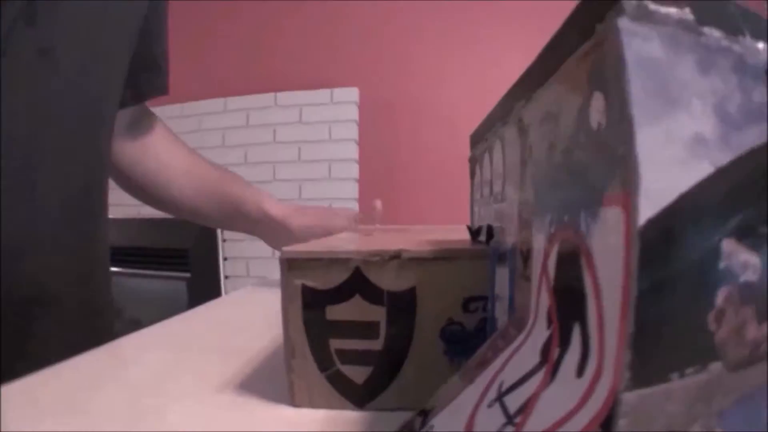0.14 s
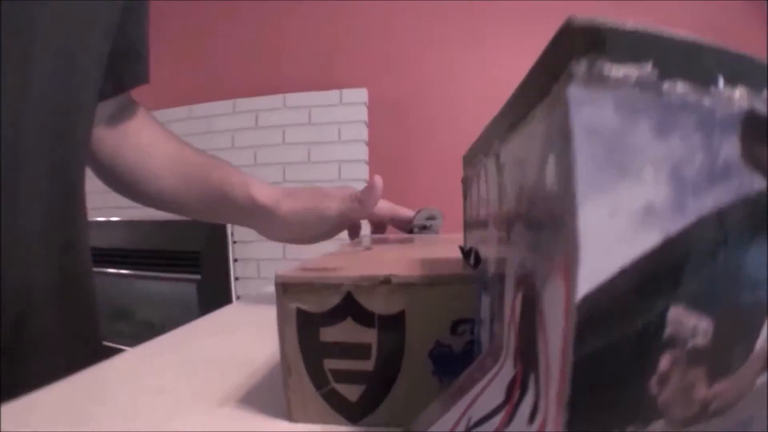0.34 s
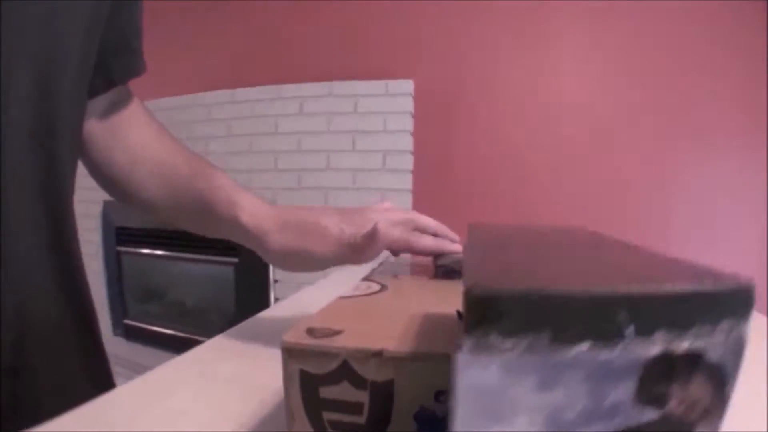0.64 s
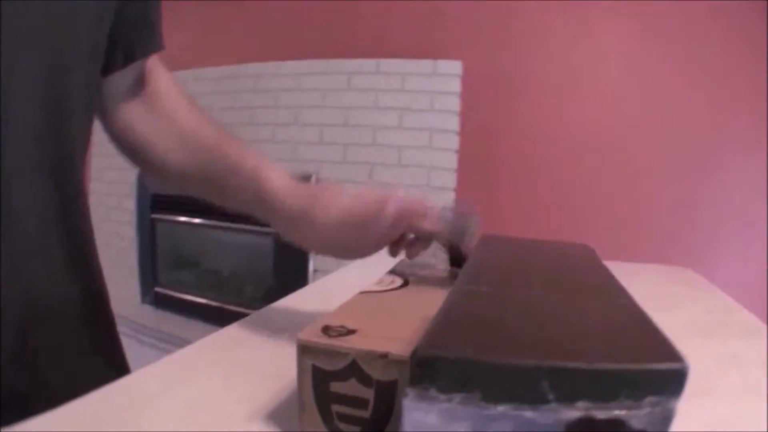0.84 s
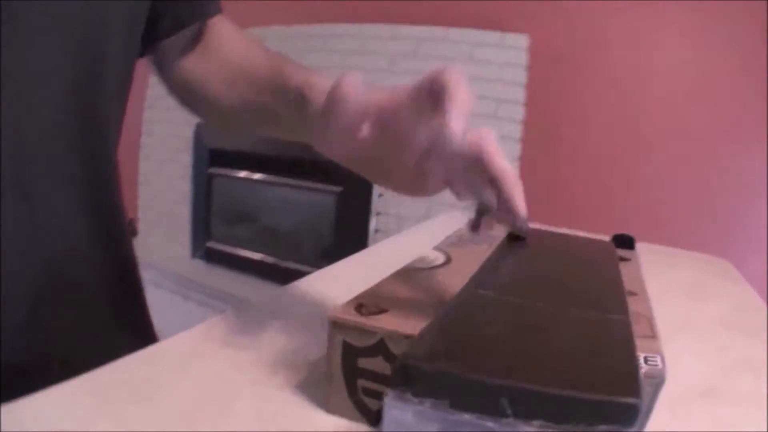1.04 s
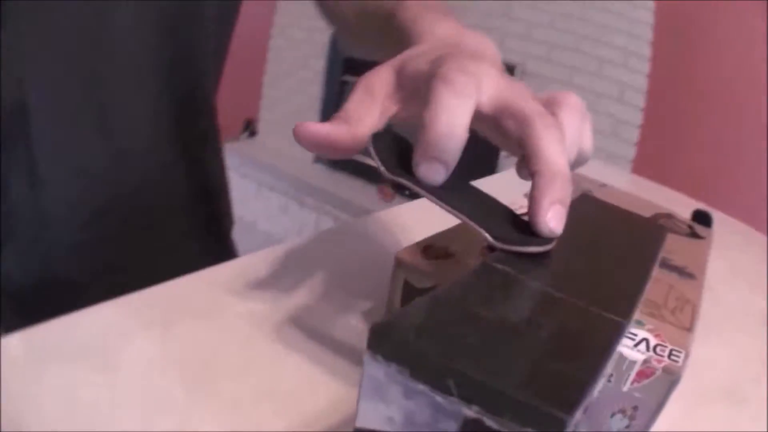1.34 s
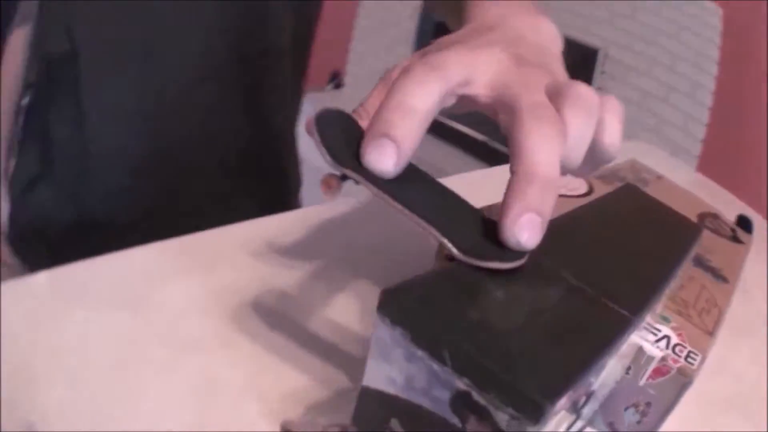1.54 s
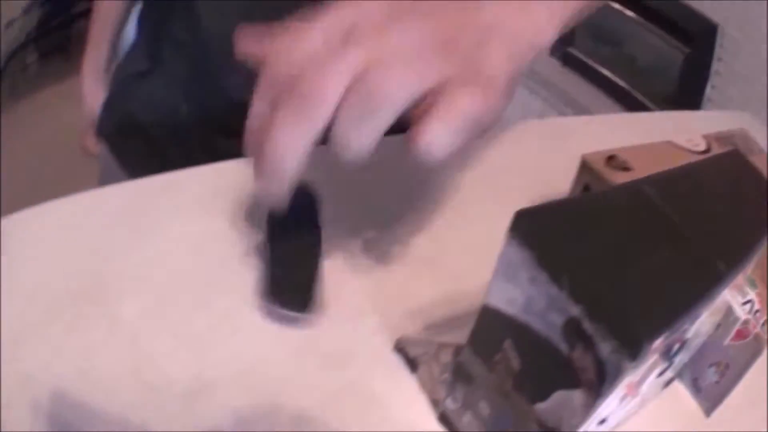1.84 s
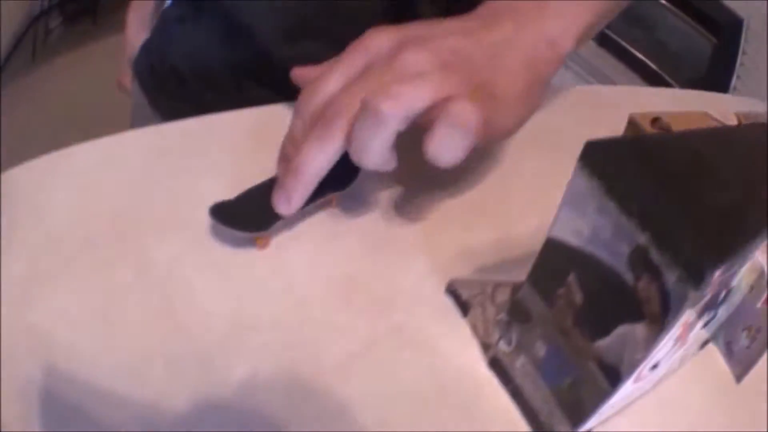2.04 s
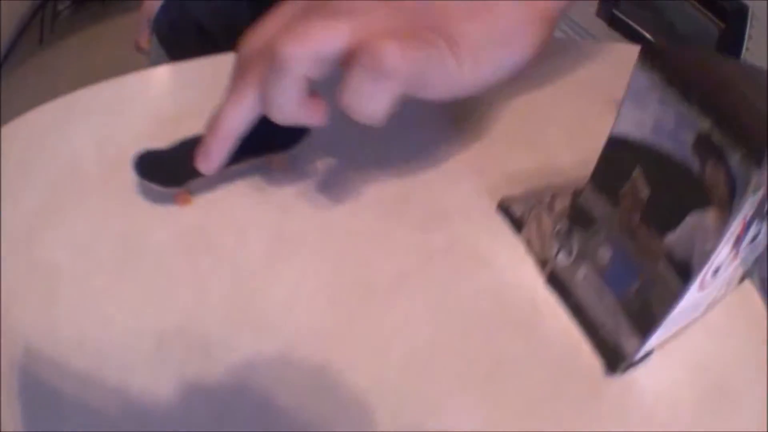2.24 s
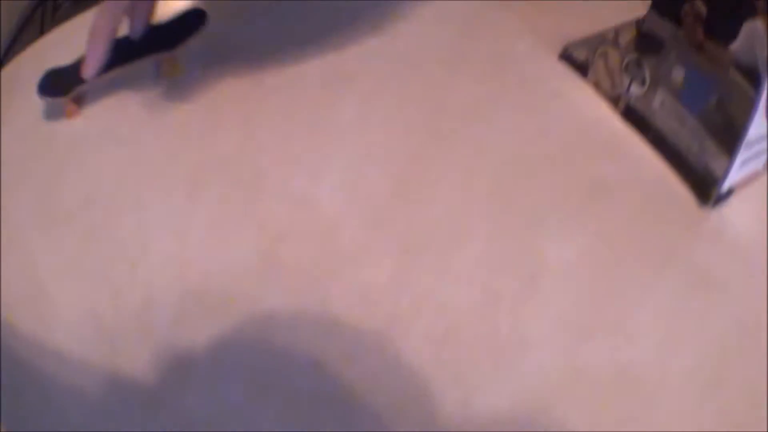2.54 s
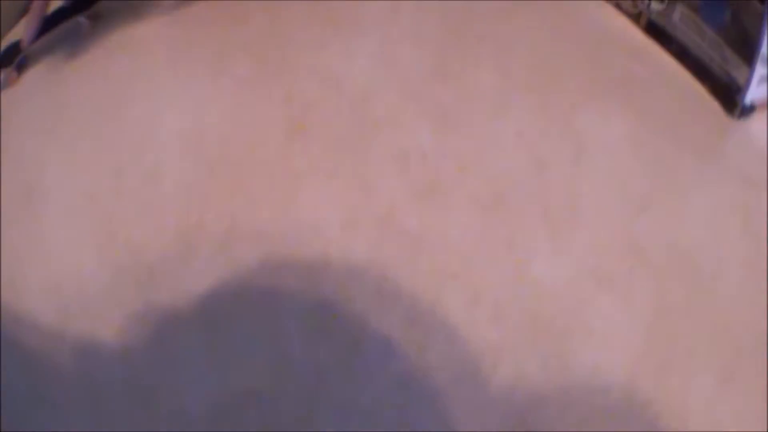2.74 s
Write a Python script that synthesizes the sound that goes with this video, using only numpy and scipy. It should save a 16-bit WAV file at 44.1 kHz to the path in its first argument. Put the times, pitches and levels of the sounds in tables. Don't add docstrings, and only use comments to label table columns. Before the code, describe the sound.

Close stereo microphone on a toy skateboard: soft rolling, hollow box thumps and clacks, light grinding and rough ticking scrape, a crisp landing with gritty skid and brief chirps, then quiet rolling in a small room.

```python
import sys
import numpy as np
from scipy import signal
from scipy.fft import rfft, irfft
from scipy.io import wavfile
from scipy.ndimage import uniform_filter1d

SR = 44100
rng = np.random.default_rng(int(sys.argv[2]) if len(sys.argv) > 2 else 0)


def invert_db(x):
    u = np.asarray(x, float) / 20
    return 10 ** u


def persist_wave(psi):
    counts = np.round(np.clip(psi, -1, 1) * 32767).astype(np.int16)
    wavfile.write(sys.argv[1], SR, np.atleast_2d(counts).T)


N = 127890
EDGE_HZ = 15900
HZ = np.fft.rfftfreq(8192, 1 / SR)

# time in seconds, surface load in dB, grit in dB relative to the load.
RUN_UP = [(0, -48, -5), (.16, -47, -4), (.242, -48, -7)]
BOX_ROLL = [(.247, -27, -7), (.3, -31, -10), (.312, -33, -12), (.33, -28, -8), (.36, -32, -17),
            (.51, -34, -14), (.602, -39, -16), (.612, -40, -6), (.655, -43, -14), (.738, -47, -18)]
RAMP_ROLL = [(.743, -31, -22), (.77, -32, -22), (.85, -32, -28), (.89, -28, -26), (.91, -32, -26),
             (.965, -27, -22), (1.01, -37, -28), (1.075, -45, -24)]
RAMP_CLIMB = [(.78, -48, -28), (.89, -32, -28), (.955, -28, -27), (1.02, -46, -26)]
TAIL_DRAG = [(1.082, -25, -16), (1.11, -29, -22), (1.195, -45, -24), (1.22, -38, -28), (1.264, -46, -22)]
GRIND = [(1.27, -41, 3), (1.34, -43, -1), (1.42, -53, -1), (1.58, -58, -2)]
SCRAPE = [(1.596, -47, 0), (1.645, -43, 1), (1.672, -49, 0), (1.69, -43, 0), (1.722, -48, 1),
          (1.75, -44, 0), (1.78, -47, 3), (1.825, -46, 7), (1.85, -46, 5), (1.878, -44, 4)]
TOUCH_DOWN = [(2.02, -38, 6), (2.05, -39, 4), (2.105, -46, 4)]
SKID = [(2.121, -43, 13), (2.17, -38, 9), (2.21, -36, 0), (2.25, -41, -4), (2.29, -46, -6)]
ROLL_OUT = [(2.295, -45, -3), (2.4, -45, -4), (2.545, -42, -1), (2.58, -45, -3), (2.62, -42, -5),
            (2.9, -45, -5)]

# frequency in Hz, width in Hz, level in dB.
COUNTER_FAR = [(525, 90, -1), (843, 40, -4), (1060, 70, -4), (1234, 97, -3)]
COUNTER = [(450, 25, -7), (715, 25, -4), (860, 40, -4), (1135, 55, 2), (1432, 40, -9)]
COUNTER_LOADED = [(300, 120, -11), (750, 200, 0), (1150, 250, 0), (1500, 200, -4), (2000, 600, -8)]
BOX = [(265, 40, -2), (500, 120, -2), (703, 50, 1), (840, 60, -2), (1120, 40, -7), (1450, 35, -6),
       (1605, 70, -5)]
RAMP = [(270, 40, -4), (415, 50, 5), (880, 120, -6)]
RAMP_FLEXED = [(880, 110, 1), (1125, 50, -5), (1620, 70, -7), (2150, 60, -12)]
RAMP_TOP = [(268, 40, 5), (313, 30, 5), (355, 50, 7), (550, 60, -3), (900, 90, -11)]
LEDGE_TOP = [(155, 50, 9), (850, 300, 0), (450, 150, -5)]
LEDGE = [(150, 32, 9), (460, 40, 0), (990, 80, -1), (1480, 60, -6), (1980, 110, -5), (2360, 70, -8)]

# frequency in Hz, width in Hz, level in dB.
AXLES = [(4150, 800, 1), (5200, 1200, -10), (2900, 900, -11), (8300, 3000, -22), (12000, 4000, -27)]
DECK_ON_BOX = [(2150, 150, 1), (2630, 500, -2), (3280, 130, -1), (3800, 800, -4), (6300, 2200, -12),
               (12000, 4000, -30)]
DECK_ON_TAPE = [(2700, 900, -7), (3380, 200, -4), (4250, 900, 0), (5400, 700, -5), (7900, 2600, -5.5),
                (12000, 4000, -15)]
DECK_LANDED = [(2300, 800, -6), (4200, 700, 0), (5000, 500, -1), (7800, 2600, -8), (12000, 4000, -17)]
SLIDING_WHEELS = [(3600, 800, 7), (4700, 1100, 8), (5550, 500, 7), (6500, 600, 7), (9500, 4000, -12)]

# time in seconds, click in dB, thud into the surface in dB relative to the click.
KNOCKS = [(.2466, -21, -3), (.2525, -22, -2), (.265, -24, -4), (.3137, -26, -8), (.321, -23, -3),
          (.6062, -20, -12), (.742, -33, 6), (.7525, -18, -7), (1.079, -18, -5), (1.2685, -12, -22),
          (1.275, -15, -22), (1.2942, -21, -13), (1.323, -23, -15), (1.4591, -25, -14), (1.495, -31, -15),
          (1.5948, -26, -12), (1.6212, -28, -10), (1.639, -27, -15), (1.6452, -23, -15), (1.6805, -27, -4),
          (1.73, -28, -12), (1.7449, -25, -9), (1.7855, -15, -24), (1.802, -20, -20), (1.8108, -16, -22.5),
          (1.821, -16, -30), (1.8258, -16, -20), (1.8758, -20, -15), (2.0184, -13, -20), (2.031, -19, -16),
          (2.039, -21, -16), (2.1104, -18, -10), (2.1178, -17, -18), (2.3266, -21, -22), (2.5057, -32, -12),
          (2.54, -25, -13), (2.6192, -12, -34)]
# time in seconds, frequency in Hz, level in dB.
RINGS = [(.0258, 4000, -45), (.1605, 4220, -44), (.2505, 640, -29), (.2513, 3600, -30), (.256, 1600, -25),
         (.287, 3200, -32), (.308, 1570, -28), (.3137, 2650, -32), (.322, 700, -26), (.325, 3280, -31),
         (.6065, 2170, -36), (.7523, 2160, -27), (.884, 400, -25), (.953, 1620, -33), (.966, 420, -23),
         (1.0795, 900, -25), (1.096, 550, -24), (1.2685, 4300, -24), (1.4591, 3600, -35),
         (1.5943, 3620, -36), (1.6212, 2320, -37), (1.6452, 3390, -32), (1.7849, 3860, -28),
         (1.8, 4500, -30), (1.8098, 4640, -27), (1.8198, 4340, -26), (1.8245, 4500, -24),
         (1.8747, 2370, -33), (1.874, 750, -35), (2.0183, 4860, -22), (2.1096, 2580, -28),
         (2.1178, 6400, -25), (2.3255, 3660, -20)]
# start in seconds, length in seconds, frequency in Hz, level in dB, wobble from 0 to 1.
SQUEAKS = [
    (1.365, .21, 885, -48, .3),
    (1.73, .096, 985, -39, .12),
    (2.314, .01, 3650, -30, .3),
    (2.328, .03, 3750, -31, .4),
    (2.128, .02, 6420, -30, 0.1),
    (0, .3, 13300, -71, .2),
]
# start in seconds, length in seconds, frequency in Hz, level in dB, wobble from 0 to 1.
CREAKS = [
    (1.616, .03, 490, -42, .25),
    (1.68, .02, 480, -39, .25),
    (1.73, .035, 470, -40, .25),
]
# time in seconds, frequency in Hz, level in dB.
SHAKES = [
    (1.079, 60, -56),
    (1.6, 72, -52),
    (2.17, 270, -35),
    (.335, 165, -41),
]
# start in seconds, length in seconds, frequency in Hz, level in dB.
GRIP = [
    (0.08, .17, 67.3, -58),
]
# frequency in Hz, time to fall 60 dB in seconds.
ROOM = [(200, 0.6), (4000, .3), (12000, .2)]
# frequency in Hz, level in dB per Hz.
HUSH = [(25, -14), (150, -2), (800, -1), (3000, -11), (7000, -13), (15000, -18)]
# frequency in Hz, side minus mid in dB.
WIDTH = [(30, 4), (70, -6), (150, -15), (300, -14), (600, -10), (1500, -9), (4000, -6.5), (9000, -2)]
# time in seconds, left minus right in dB.
LEAN = [(0, 3.5), (.5, 3), (.9, 3), (1.2, .5), (1.9, .5), (2.5, -1)]

BUMPS_PER_S, BUMP_SPREAD_DB = 6000, 1.2
GRIT_PER_S, GRIT_SPREAD_DB = 14000, 1.1
LUMPY_DB, LIFT_S = 1.2, .004
BED_DB, LOW_EDGE_HZ, HIGH_EDGE_HZ = -19, 200, 1300
RATTLE_S, RATTLE_DB = .03, -17
TICK_S, CLICK_DB, TICK_HZ = .008, -11.5, 6500
THUD_S = .005
RING_S, RING_SLOPE, RING_PAIR = .055, .6, 1.04
OVERTONE_DB, CREAK_DB = -15, -4
SCATTER_S, ROOM_DB, HUSH_DB = .02, -15, -60


def contact(curve, surface, deck, lumpy_db=LUMPY_DB, tick_hz=TICK_HZ):
    s, load_db, grit_db = np.transpose(curve)
    t = np.arange(N) / SR
    touching = np.clip(np.minimum(t - s[0], s[-1] - t) / LIFT_S + 1, 0, 1)
    load = touching * invert_db(np.interp(t, s, load_db) + lumpy_db * wander(73))
    bumps = load * grains(BUMPS_PER_S, BUMP_SPREAD_DB)
    grit_level = invert_db(np.interp(t, s, grit_db) + lumpy_db * wander(250))
    grit = load * grit_level * grains(GRIT_PER_S, GRIT_SPREAD_DB)
    thud, rattle, tick = knocks(s[0] - .012, s[-1] - .002)

    bed = invert_db(2 * BED_DB) / (1 + (HZ / HIGH_EDGE_HZ) ** 4.)
    low_cut = 1 + (LOW_EDGE_HZ / (HZ + 1)) ** 5.6
    thin = 1 / (1 + (1800 / (HZ + 1)) ** 4.)
    body = causal((modes(surface) + bed) / low_cut)
    shell = causal(modes(deck, 1.5) * thin)
    hard = causal(thin / (1 + (HZ / tick_hz) ** 4.2))
    parts = [(bumps + thud, body), (grit + rattle, shell), (tick, hard)]
    return sum(signal.oaconvolve(x, h)[:N] for x, h in parts)


def knocks(start, end):
    thud, rattle, tick = np.zeros((3, N))
    rough, soft = rng.standard_normal((2, N))
    u = np.arange(4000) / SR
    for at, db, thud_db in KNOCKS:
        if start <= at < end:
            first = round(at * SR)
            part = slice(first, first + len(u))
            rattle[part] += invert_db(db + RATTLE_DB - 60 * u / RATTLE_S) * rough[part]
            tick[part] += invert_db(db + CLICK_DB - 60 * u / TICK_S) * np.sign(rough[part])
            thud[part] += invert_db(db + thud_db) * np.exp(-u / THUD_S) * soft[part]
    return thud, rattle, tick


def grains(per_s, spread_db):
    u, e, g = rng.random(N), rng.exponential(1, N), rng.standard_normal(N)
    return evened((u < per_s / SR) * g * invert_db(spread_db * np.minimum(e, 5)))


def wander(per_s):
    size = max(int(SR / per_s), 2)
    slow = uniform_filter1d(rng.standard_normal(N), size)
    return evened(uniform_filter1d(slow, size))


def evened(x):
    return x / np.sqrt(np.mean(x ** 2) + 1e-20)


def modes(table, steep=1.034):
    return sum(invert_db(2 * db) / (1 + (2 * (HZ - f) / width) ** 2) ** steep for f, width, db in table)


def causal(power):
    cepstrum = irfft(np.log(power + 1e-9) / 2)
    cepstrum[1:4096] *= 2
    cepstrum[4097:] = 0
    h = irfft(np.exp(rfft(cepstrum)))[:4096]
    return h / np.linalg.norm(h)


def rings(table):
    out, u = np.zeros(N), np.arange(12000) / SR
    for at, hz, db in table:
        pair = np.sin(2 * np.pi * hz * u) + .6 * np.sin(2 * np.pi * hz * RING_PAIR * u)
        t60 = RING_S * (1e3 / hz) ** RING_SLOPE
        rise = (1 - np.exp(-2 * u * hz)) ** 2
        out[round(at * SR):][:len(u)] += invert_db(db - 60 * u / t60) * rise * pair
    return out


def squeak(start, length, hz, db, wobble, over_db=OVERTONE_DB, count=3):
    t = np.arange(N) / SR
    turns = np.cumsum(hz * (1 + 0.0094 * wander(153.7))) / SR
    tone = sum(invert_db(over_db * k) * np.sin(2 * np.pi * (k + 1) * turns)
               for k in range(count) if hz * (k + 1) < EDGE_HZ)
    arch = abs(np.sin(np.pi * np.clip((t - start) / length, 0, 1) ** 0.86)) ** .5
    bursts = 1 - wobble + wobble * wander(1500)
    return invert_db(db + 3.5 * wander(100)) * bursts * arch * tone


def scattered(x):
    lag = np.arange(3000) / SR
    near = rng.standard_normal(len(lag)) * np.exp(-lag / SCATTER_S)
    return signal.oaconvolve(x, near / np.linalg.norm(near))[:N]


def room(x):
    taps = np.zeros((2, SR // 2))
    at = np.arange(200, SR // 2 - 20, 20)
    at = at + rng.integers(0, 20, (2, len(at)))
    np.put_along_axis(taps, at, rng.choice([-1., 1.], at.shape), 1)
    hz, t, z = signal.stft(taps, SR, nperseg=256)
    decay = invert_db(-60 * t / read(ROOM, hz)[:, None])
    tail = signal.istft(z * decay, SR, nperseg=256)[1]
    return signal.fftconvolve(x[None], tail / np.linalg.norm(tail[0]), axes=1)[:, :N]


def room_hush():
    hush = shaped(rng.standard_normal((2, N)), HUSH)
    return hush * invert_db(HUSH_DB) / np.sqrt(np.mean(hush ** 2))


def shaped(x, points):
    hz = np.fft.rfftfreq(x.shape[-1], 1 / SR)
    return irfft(rfft(x) * invert_db(read(points, hz)), x.shape[-1])


def read(points, hz):
    f, value = np.transpose(points)
    return np.interp(np.log(hz + 1), np.log(f + 1), value)


def scene():
    board = contact(RUN_UP, COUNTER_FAR, AXLES)
    board += contact(BOX_ROLL, BOX, DECK_ON_BOX)
    board += contact(RAMP_ROLL, RAMP, DECK_ON_BOX)
    board += contact(RAMP_CLIMB, RAMP_FLEXED, DECK_ON_BOX)
    board += contact(TAIL_DRAG, RAMP_TOP, DECK_ON_TAPE)
    board += contact(GRIND, LEDGE_TOP, DECK_ON_TAPE)
    board += contact(SCRAPE, LEDGE, DECK_ON_TAPE, lumpy_db=2.2)
    board += contact(TOUCH_DOWN, COUNTER_LOADED, DECK_LANDED)
    board += contact(SKID, COUNTER_LOADED, SLIDING_WHEELS)
    board += contact(ROLL_OUT, COUNTER, AXLES, tick_hz=13000)
    board += rings(RINGS)
    board += sum(squeak(*row) for row in SQUEAKS)
    board += sum(squeak(*row, CREAK_DB, count=5) for row in CREAKS)

    shake = rings(SHAKES)
    grip = sum(squeak(*row, wobble=.1) for row in GRIP)
    wet = invert_db(ROOM_DB) * room(board)
    hush = room_hush()
    mid = board + shake + grip + wet[0] + hush[0]
    late_shake = .5 * np.roll(shake, 300)
    side = shaped(scattered(board) + late_shake + wet[1] + hush[1], WIDTH)
    lean = invert_db(np.interp(np.arange(N) / SR, *np.transpose(LEAN)) / 2)
    return np.array([(mid + side) * lean, (mid - side) / lean])


def top_cut(x):
    return signal.sosfilt(signal.butter(12, 16810, fs=SR, output="sos"), x)


def record(dry):
    edge = signal.firwin(255, EDGE_HZ, window=("kaiser", 9), fs=SR)
    mix = signal.oaconvolve(dry, edge[None], "same")
    return top_cut(mix)


dry = scene()
out = record(dry)
persist_wave(out)
```